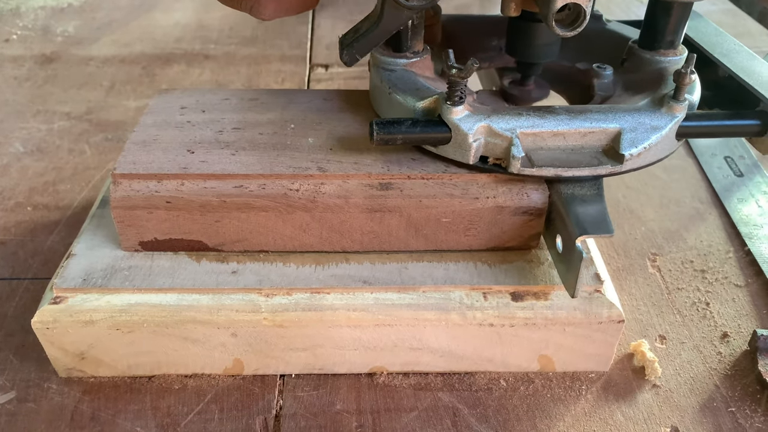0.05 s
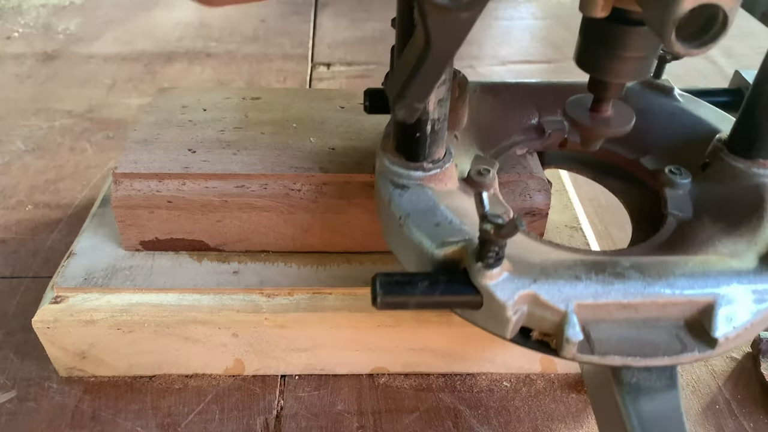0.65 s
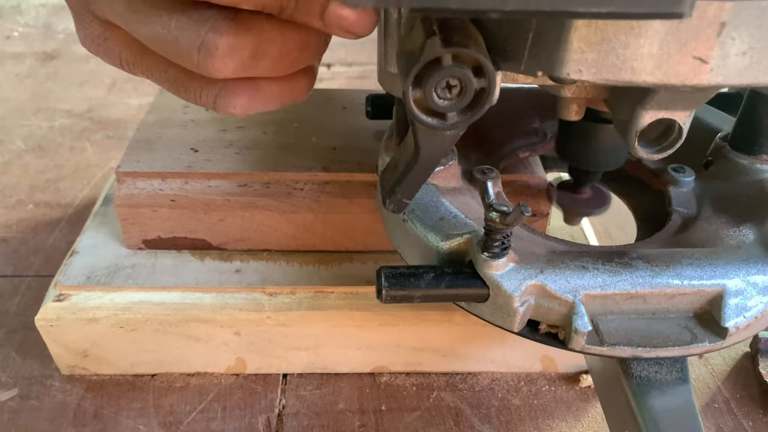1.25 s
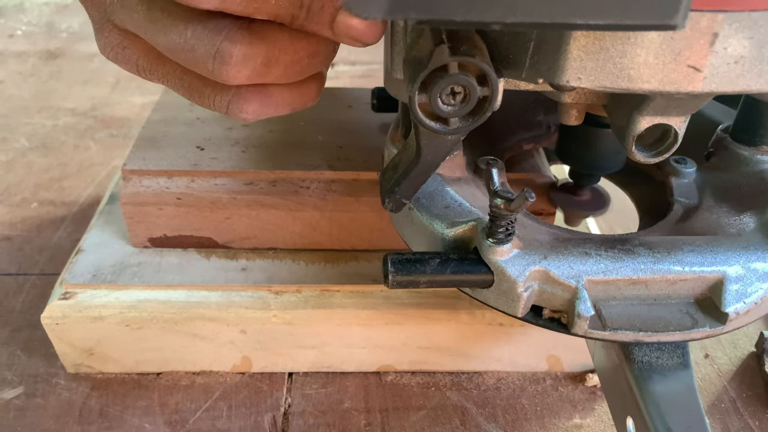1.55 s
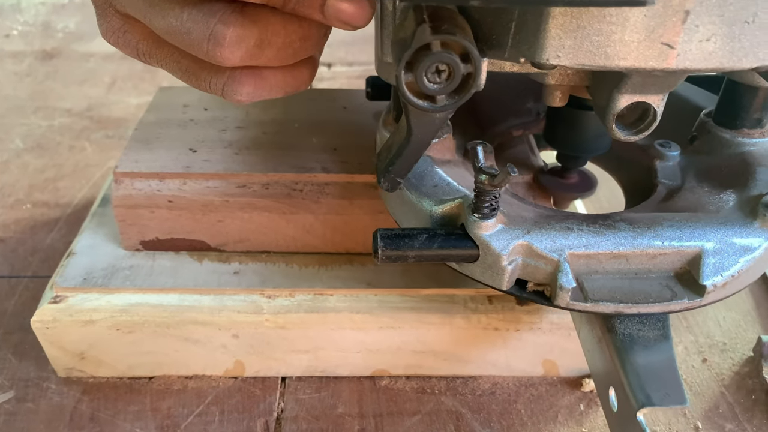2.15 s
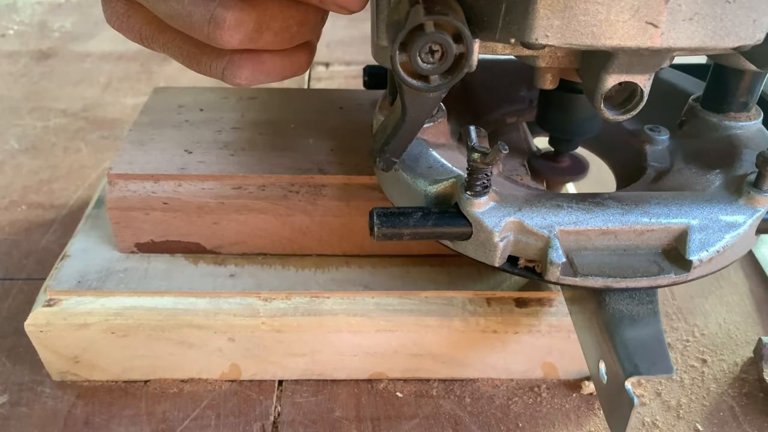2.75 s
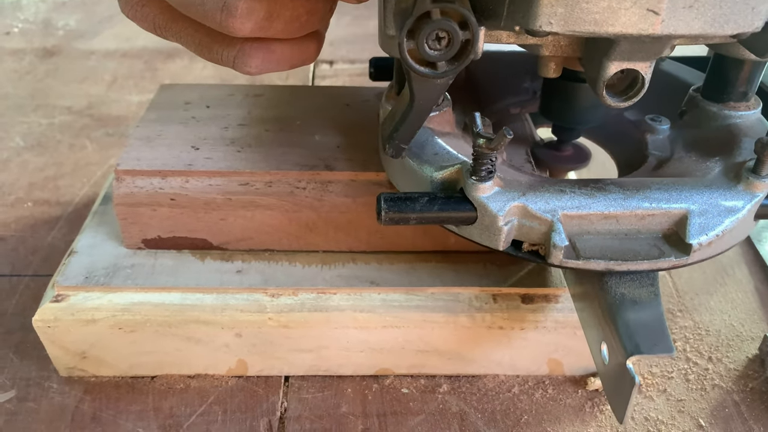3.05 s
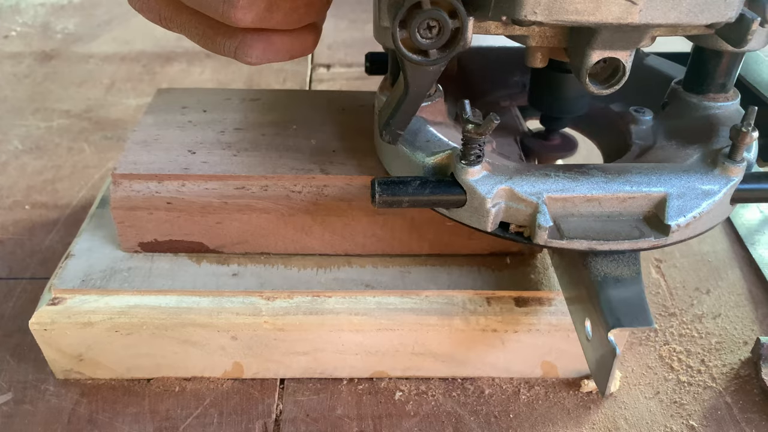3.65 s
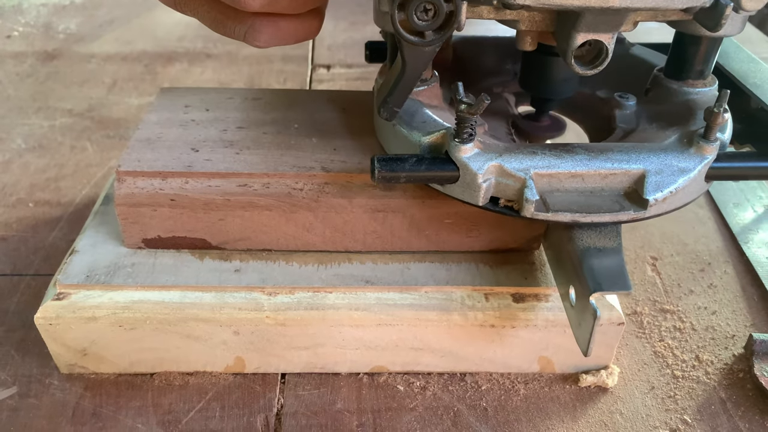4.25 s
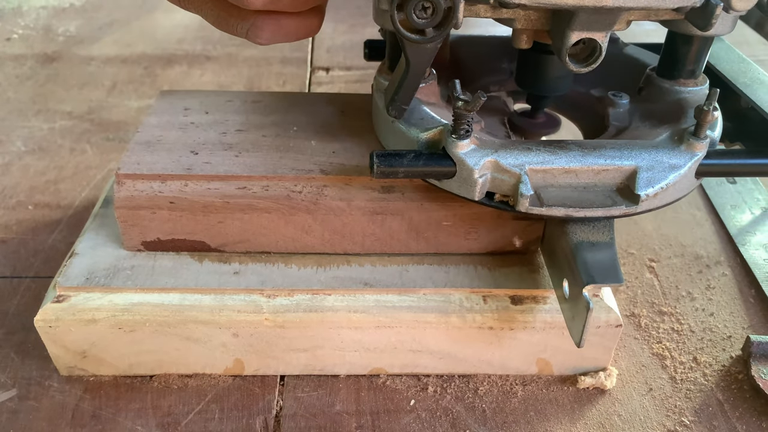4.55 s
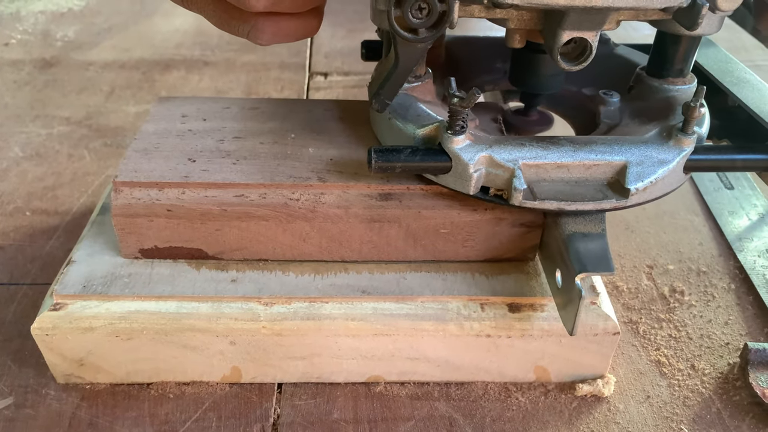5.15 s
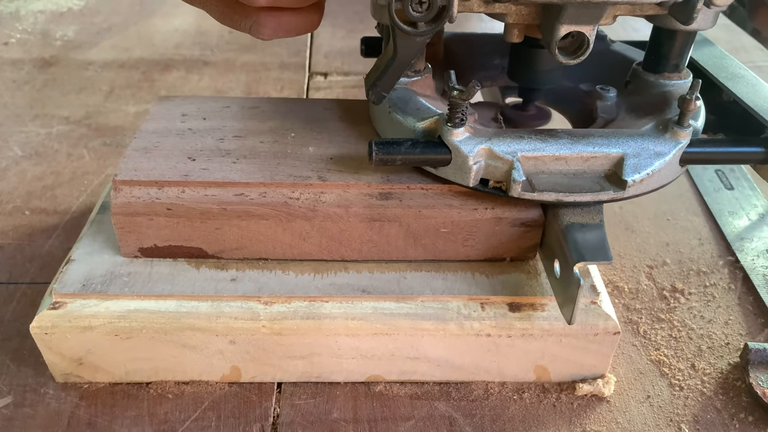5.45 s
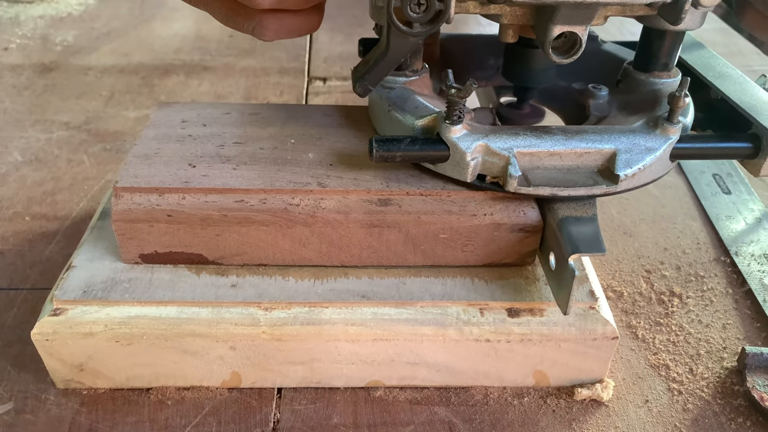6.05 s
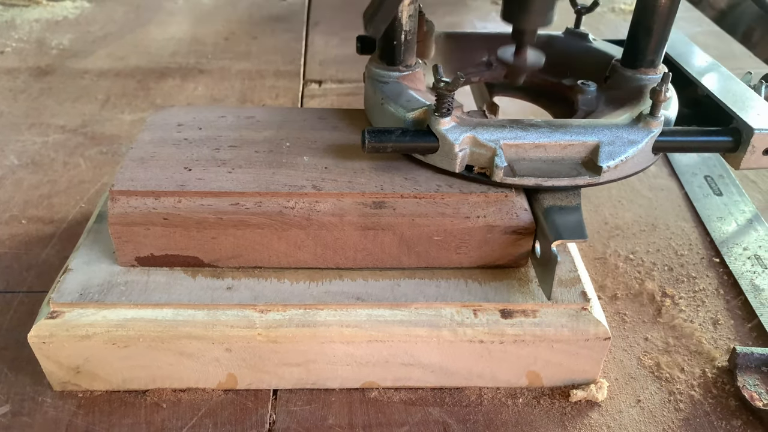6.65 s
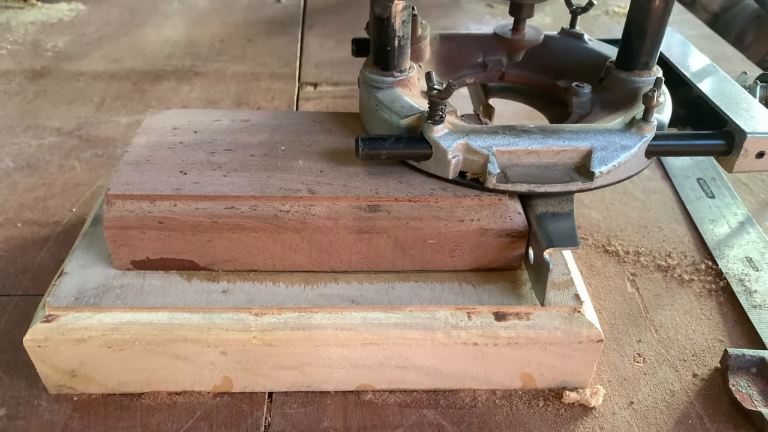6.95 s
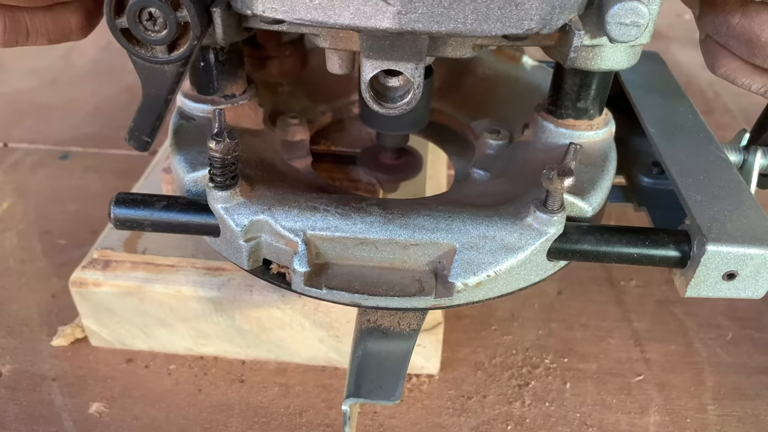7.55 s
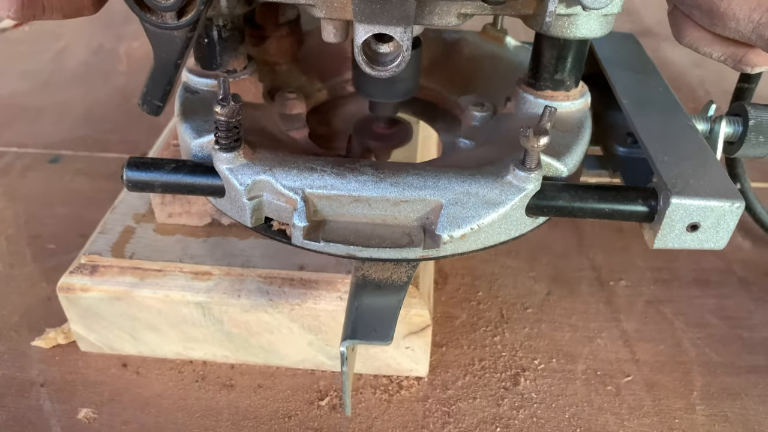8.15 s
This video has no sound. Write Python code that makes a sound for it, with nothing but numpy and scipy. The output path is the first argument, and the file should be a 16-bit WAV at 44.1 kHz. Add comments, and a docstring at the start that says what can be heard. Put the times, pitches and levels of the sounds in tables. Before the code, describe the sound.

A router runs up, bites into a wood block with a falling, buzzing whistle, clears it, then abruptly cuts again.

```python
"""A plunge router shapes the end of a hardwood block, beside a phone on a workbench.
It clears the wood and runs up in a bed of roaring, hissing cooling air; the base knocks, the fence rings.
At 1.8 s the bit bites and the spindle sags: hum, cutter whistle and fan whine glide down together,
while knife strokes buzz, chips crackle and the base judders. Near 6.5 s the bit comes free and the
pitch climbs. At 7.26 s a second pass breaks in abruptly, already in the wood."""
import sys
import numpy as np
from scipy import signal
from scipy.fft import rfft, irfft
from scipy.io import wavfile

SR = 44100
rng = np.random.default_rng(int(sys.argv[2]) if len(sys.argv) > 2 else 0)


def store_wav(level_fs):
    """Save 16-bit WAV to argv[1]."""
    pcm = np.round(np.clip(np.atleast_2d(level_fs), -1, 1) * 32767)
    wavfile.write(sys.argv[1], SR, pcm.T.astype(np.int16))


N = 370440
TIME = np.arange(N) / SR
FREQ = np.maximum(np.arange(N // 2 + 1) * SR / N, 1)
SIDES = np.array([[1], [-1]])  # left, right
MID_CUT_S, SECOND_PASS_S = 4.5, 7.263
FULL_BITE_DB, CUT_ROAR_DB = -30.5, -54  # reference points for whistle and roar in the cut

# Stereo image at the phone's two microphone ports; a lead is the left side's phase lead:
# f/Hz, coherence/0-1, lead/rad, lead for air from the gap/rad, lead for second-pass air/rad
PORT_IMAGE = [(70.4, 0.93, -4.5, -3.5, -4.5), (221, 1, -3, -2.5, -3), (350, 0.93, -0.5, -1.5, -1.3),
              (516, 0.85, 0.5, 2, 0.8), (773, 0.85, 1.8, 1.84, 1.77), (1090, 0.94, 0.45, .4, 1.86),
              (1400, .8, 1.1, 1, -1), (1800, 0.68, -1.2, -.9, -1), (2300, 0.33, -1.5, -1.5, 0.5),
              (2750, .45, -1.5, -1, 0), (3300, 0.46, -.4, 1.5, 1.2), (3750, 0.64, 0.5, -1.9, -1),
              (4200, 0.8, -1.1, -3, -0.3), (4770, 0.47, -2.5, -3.5, 3.3), (5400, .25, -2, -2, 0.7),
              (6100, 0.5, 0, 0.5, 2), (6800, 0.36, -0.4, 0.2, 0.2), (8000, 0.26, -2.5, -4.5, -2.7),
              (8650, .27, -2, -0.5, -4.5), (9400, 0.06, -0.2, -3, -5.5), (12500, 0.2, 1.5, -4.5, -4.5),
              (15000, .1, -7, -6, -7)]
# Left minus right at the ports: f/Hz, balance/dB
PORT_BALANCE = [(600, 0.5), (1300, -4.5), (2400, 0), (4400, 0.5), (6500, 2), (9000, 1), (11500, -0.5),
                (12200, -9), (15000, -22)]
# Thin jet of cooling air, strongest as the bit enters: t/s, level/dB
JET_LEVEL = [(0, -62), (.7, -51), (1.2, -47.5), (2.15, -47.5), (2.8, -52.5), (3.2, -63), (4, -59),
             (6.6, -69), (7.25, -77), (7.3, -58), (8.4, -64)]
# Air faders for each pass, ahead of the trims: t/s, roar/dB, vent hiss/dB
AIR_FADERS_FIRST = [(0, -50, -48.5), (.42, -49.5, -45.5), (.72, -46, -42.5), (1.2, -46.5, -45.5),
                    (1.96, -45.5, -45), (3, -49, -48), (3.32, -53.5, -54), (4.1, -54, -56),
                    (4.3, -52.5, -52.5), (4.84, -54.5, -54), (6.55, -55.5, -54), (6.84, -52, -46),
                    (7.23, -53.5, -49.5)]
AIR_FADERS_SECOND = [(7.29, -41.5, -41.5), (7.57, -41, -41.5), (7.62, -41.5, -42), (8.36, -47, -46)]
# EQ of the air: f/Hz, gain at the start/dB, gain deep in the cut/dB, gain in the second pass/dB
AIR_EQ = [(30.02, -32, -49, -50), (74, -16.5, -11, -12), (108, -13, -23, -16.5), (165, -18, -16, -20),
          (223, -5.5, -6.5, -15), (300, -10, -7.5, -14), (460, -6, -5.5, -7), (750, -1, 3, -2.5),
          (1090, 2.5, 3.5, 6), (1560, -0.5, 1, -6.5), (1930, 5.5, 6.5, 3), (2060, 1, 1.5, 4.5),
          (2630, -.5, 3, -9), (2980, -6.5, -10, -6), (3360, -5, -5.5, -2.5), (4050, 4.5, -8.5, 3),
          (4520, 2.5, -3.5, 2), (5380, 4.5, -2, 2), (6400, 2, -4, -1), (7300, -0.5, -3.5, 0.5),
          (7970, -2, -3.5, -3), (9880, -3, -13.5, -5), (11870, -18, -38, -15), (12160, 2, -4, -4),
          (16000, -9.5, -15.5, -16)]
# The base closes over the cut and opens again: t/s, mix/0-1
COVER_MIX = [(2.4, 0), (3.3, 1), (6.3, 1), (6.8, 0.35)]
# The bit is lowered to the block's edge, leaving a narrow gap: t/s, mix/0-1
GAP_MIX = [(.9, 0.24), (1.25, 0.9), (2.5, 1), (3.3, 0.3)]
# Air resonances in that gap: f/Hz, width/Hz, lift/dB
GAP_PEAKS = [(3240, 230, 11.5), (7900, 2100, 8.5), (9000, 690, -0.5)]
# Body of the base's knock on the block: f/Hz, width/Hz, relative level/dB
KNOCK_MODES = [(290, 120, -1), (510, 260, -4)]
# Ring of the metal fence: f/Hz, level/dB
FENCE_MODES = [(1310, -46), (1830, -48.5)]
# Bearing drones; an order is a multiple of spindle speed: order, level/dB, dB per dB of roar, lead/rad
BEARING_TONES = [(.5, -79, .5, -2.5), (0.655, -78, 0.5, -1.9), (4.35, -66.5, 0.86, -1.5)]
# The base rests unevenly and rocks: t/s, length/s, level/dB
ROCKING = [(0.287, 0.11, -49), (0.61, .08, -57), (0.69, 0.2, -51), (2.16, 0.34, -55), (2.801, 1, -71)]
# Fan whine, fading in and out as the tool is turned: t/s, level/dB, lead/rad
FAN_WHINE = [(0, -53.5, -4), (.2, -57, -1.3), (.33, -43, -1.1), (.5, -46.5, -2.5), (.84, -45, -2),
             (1.05, -58, -2.5), (1.38, -51.5, 1), (1.65, -66, 1), (1.9, -51, -2.5), (2.12, -46, 1.2),
             (2.6, -50.5, -2.6), (2.85, -54, -2), (3.1, -49.5, -2), (4.25, -55.5, -2), (4.5, -62, -2),
             (5.1, -66, -1), (5.7, -52.5, -.6), (6.38, -53, -1.4), (6.52, -63, -2.2), (6.66, -55.5, -2),
             (6.72, -49, -6), (6.83, -45.5, 0.7), (7.02, -52.5, -0.7), (7.2, -50, -2), (7.3, -51, 0.8),
             (7.56, -45.5, 0), (7.73, -52.5, 1.2), (7.9, -45.5, 1), (8, -54, 1), (8.2, -45.5, 0.6),
             (8.35, -54, 2)]
# Spindle hum: t/s, level/dB
HUM_LEVEL = [(0, -45), (.2, -42.5), (.88, -49), (1.12, -62.5), (1.36, -56.5), (1.45, -46.5), (2.13, -43),
             (2.24, -49.5), (2.5, -40.5), (2.74, -39), (3.41, -56.5), (3.67, -46), (4.43, -45),
             (4.85, -53.5), (5.91, -55), (6.6, -44), (7.1, -50.5), (7.3, -47), (7.9, -48.5), (8.3, -53)]
# The hum ducks as the tool is swung about: t/s, length/s
HUM_DUCKS = [(0.128, 0.074), (0.276, 0.11), (0.43, 0.28), (0.748, 0.12), (6.73, 0.094)]
# Spindle speed for each pass, running up while free and sagging in the wood: t/s, f/Hz
SPINDLE_FIRST = [(0.0, 477), (0.2, 480.3), (0.33, 497.4), (0.54, 513.4), (1.18, 544.2), (1.6, 553.7),
                 (1.83, 557.6), (1.95, 553), (2.17, 534.6), (2.63, 490), (3.07, 455.4), (3.39, 442.2),
                 (3.6, 436.5), (3.77, 436.2), (4.08, 430.5), (4.59, 428), (4.81, 433.7), (5.8, 431.7),
                 (6.03, 435.5), (6.2, 437.8), (6.47, 455.5), (6.68, 480), (6.84, 494.3), (7.25, 449.6)]
SPINDLE_SECOND = [(7.28, 473.7), (7.41, 480.4), (7.56, 481), (7.75, 479.5), (8.08, 468), (8.39, 466.2)]
# The bit is in the wood during the first pass: entry t/s, exit t/s
IN_WOOD = [(-.1, 0.14), (1.811, 6.48)]
# How hard the knives bite in each pass: t/s, whistle level/dB, left minus right/dB
KNIFE_BITE_FIRST = [(.1, -33.5, -3), (1.85, -37.5, -.5), (2.12, -36.5, .3), (2.46, -41, .5),
                    (2.62, -34.5, -1.5), (3.02, -28.5, -2.5), (3.19, -32.5, -3), (4.15, -34.5, -4.5),
                    (4.5, -37, -8), (4.66, -41, -8.5), (4.88, -36.5, -7), (6.14, -36.5, -6.5),
                    (6.22, -42, -4), (6.36, -38, -4), (6.45, -46.5, -4)]
KNIFE_BITE_SECOND = [(7.27, -35.5, -6), (7.52, -32, -4), (7.84, -32.5, -4), (7.96, -30, -5),
                     (8.06, -31.5, -1), (8.18, -30.5, -6), (8.24, -34, -1), (8.39, -31, -1.5)]
# Resonances of base plate and housing that the overtones glide through: f/Hz, width/Hz, lift/dB
HOUSING_PEAKS = [(2458, 293, 11.5), (3890, 680, 7), (4590, 300, 2), (5400, 220, 13), (7670, 270, 7.5),
                 (9260, 730, 13.5)]
# One overtone of the router swells briefly, in the wood or spinning free: t/s, length/s, order, level/dB
OVERTONE_SWELLS = [(.02, 0.3, 2, -49), (.3, .4, 2, -55), (.02, .25, 3, -52), (.03, 0.35, 5, -53),
                   (0.04, 0.33, 6, -56), (0.03, 0.4, 7, -62), (.02, 0.29, 11, -57), (0.184, 0.14, 4, -52),
                   (0.503, 0.67, 3, -53), (0.87, 0.5, 2, -50.5), (1.86, 0.28, 14, -45.5),
                   (1.84, 0.2, 16, -53), (1.9, 0.36, 22, -51), (2.12, 0.55, 7, -51), (2.12, 0.25, 14, -47),
                   (2.12, .3, 16, -54), (2.23, 0.35, 8, -53), (2.12, .3, 6, -53), (2.35, .2, 6, -55),
                   (2.36, 0.58, 2, -39), (2.454, 1.2, 3, -46), (2.8, .7, 7, -55), (2.556, 1.4, 5, -50),
                   (2.8, .4, 11, -56), (2.85, .8, 8, -50), (2.85, 1.1, 18, -58), (2.9, .9, 28, -59),
                   (3, 0.81, 24, -60.5), (2.905, 0.33, 14, -44), (2.95, .35, 13, -56),
                   (2.95, 0.75, 20, -55), (2.99, 0.7, 10, -48), (3.2, .9, 6, -47), (3.35, .7, 14, -54),
                   (3.9, .9, 26, -61), (3.35, .7, 22, -63), (3.2, 0.3, 8, -54), (3.3, 1.7, 2, -48),
                   (3.75, 1.1, 5, -57), (3.9, 2.2, 3, -50), (3.65, .4, 10, -54), (3.8, .5, 8, -59),
                   (4.03, 1.3, 18, -52), (4.22, 0.5, 10, -51), (4.25, 0.7, 13, -54), (4.345, 0.32, 9, -54),
                   (4.48, .35, 5, -56), (4.38, 0.49, 8, -56), (4.85, .35, 9, -66), (5.05, 1.1, 10, -53),
                   (5.4, 0.72, 9, -60), (5.5, .8, 18, -57), (6.42, .25, 18, -58), (5.4, 1.5, 20, -62),
                   (5.35, 1.5, 16, -57), (5.6, 0.8, 10, -56), (5.98, 0.3, 8, -52), (6.28, .2, 8, -53),
                   (6.3, .3, 3, -57), (6.287, 0.45, 2, -51), (6.41, 0.25, 16, -54), (6.85, .25, 3, -55),
                   (6.88, .25, 5, -53), (7.36, 0.3, 6, -45), (7.55, 1, 2, -46), (7.53, .15, 17, -56),
                   (7.65, .8, 7, -56), (7.6, 1.1, 5, -50), (7.68, .16, 6, -49), (7.9, 0.4, 6, -44),
                   (8.27, .45, 6, -49), (8.053, .35, 16, -54), (8.15, 0.5, 13, -55), (4.11, 0.3, 6, -46),
                   (4.8, .7, 6, -49), (5.4, 1, 6, -50), (6.05, 1, 6, -47.5), (6.82, 0.14, 4, -51),
                   (7.598, .1, 11, -47.5)]
# Knife-stroke buzz, up into the treble: order, relative level/dB, lead/rad
BUZZ_TONES = [(5, -12.5, -1.5), (7, -11.5, -1), (9, -16.5, -0.5), (11, -10.5, 1), (13, -3.5, -1.8),
              (15, -10, 3), (16, -12, -1), (17, -13, -3.5), (19, -16, -3.5), (20, -16.5, 0.3), (21, -24, 2),
              (22, -15.5, 0.7), (23, -13, 2.7), (24, -17, 1.3), (26, -22, 4), (28, -7, -1.5), (30, -5, -1),
              (32, -7, -4), (34, -7, -3)]
# Overtones of the two knives, ahead of the housing's lift: order, free level re roar/dB,
# level at full bite/dB, dB per dB of bite, second-pass lift/dB, lead in mid cut/rad,
# its drift as the tool travels/(rad/s), second-pass lead/rad
KNIFE_TONES = [(2, -12, -48.5, 0.62, 5, 2, -0.043, -2), (3, -13, -59, 1, 12, 0.93, 0.26, 1.05),
               (6, -34, -55, 2, -3, -2.3, 0.42, -0.9), (8, -33, -62, 0.3, -4, 1.13, .1, 4),
               (10, -32, -55, 1.8, -8, 2, -0.00079, 1.5), (14, -28, -58.5, 1, -10, 0, 0.51, -5),
               (18, -34, -59.5, 2, -6, 1.3, 0.47, 0)]
# The whistle's image shifts with its pitch: f/Hz, lead/rad
WHISTLE_IMAGE = [(1740, -0.7), (1980, -0.67), (2170, 0.63)]


def undb(db):
    """Decibels to gain."""
    return 10 ** (np.asarray(db) / 20)


def unit(x):
    """Scale to rms 1."""
    return x / np.sqrt(np.mean(x ** 2))


def curves(rows):
    """One automation lane per column, in straight ramps over time."""
    times, *columns = np.transpose(rows)
    return np.array([np.interp(TIME, times, column) for column in columns])


def passes(first, second):
    """Hard switch from the first pass to the second."""
    return np.where(TIME < SECOND_PASS_S, first, second)


def swell(centre_s, length_s):
    """A smooth rise and fall, peak 1."""
    return np.cos(np.pi * np.clip((TIME - centre_s) / length_s, -.5, .5)) ** 2


def walk(rate_hz):
    """Smooth random modulator of rms 1, rolling off above rate_hz."""
    count = N // 30
    hz = np.arange(count // 2 + 1) * SR / N
    slow = irfft(rfft(rng.standard_normal(count)) / (1 + (hz / rate_hz) ** 4), count)
    return np.interp(TIME, np.linspace(0, TIME[-1], count), unit(slow))


def spectrum(rows):
    """Points joined on a log-frequency axis."""
    hz, value = np.transpose(rows)
    return np.interp(np.log(FREQ), np.log(hz), value)


def resonance(hz, width_hz):
    """Response of one damped mode, gain 1 at its centre."""
    return 1 / (1 + 1j * (FREQ / hz - hz / FREQ) * hz / width_hz)


def lift_db(hz, peaks):
    """Lift that a set of resonances gives a frequency."""
    return sum(db / (1 + (2 * (hz - centre) / width) ** 2) for centre, width, db in peaks)


def pan(db):
    """Left and right gains at constant power."""
    gains = undb(SIDES * db / 2)
    return gains / np.sqrt(np.mean(gains ** 2, axis=0))


def ports(pair, lead_column=0):
    """Spectra of two unrelated noises as the microphone ports hear them."""
    mid, side = rfft(pair)
    hz, coherence, *leads = np.transpose(PORT_IMAGE)
    alike = np.clip(spectrum(np.c_[hz, coherence]), 0, .99)
    stereo = mid * np.sqrt(1 + alike) + SIDES * side * np.sqrt(1 - alike)
    phase_shift = np.exp(.5j * SIDES * spectrum(np.c_[hz, leads[lead_column]]))
    return stereo * phase_shift * pan(spectrum(PORT_BALANCE))


def shaped_noise(response):
    """Filtered noise at the ports, rms 1."""
    return unit(irfft(ports(rng.standard_normal((2, N))) * response, N))


def partial(angle, lead):
    """A sine of rms 1, its left side ahead by lead radians."""
    return np.sqrt(2) * np.sin(angle + rng.uniform(0, 2 * np.pi) + SIDES * lead / 2)


def jet():
    """Air squeezed under the base sings in a narrow, very high band."""
    return shaped_noise(resonance(hz=12650, width_hz=1900) ** 2) * undb(curves(JET_LEVEL)[0])


def air(angle, roar_db, hiss_db, crossover_hz=3000, flicker_db=1.1, roar_trim_db=1.51, hiss_trim_db=2.5):
    """The bed: fan air roars in the housing and hisses from the vents; the base colours it."""
    noise = rng.standard_normal((2, N))
    hz, *eq_columns = np.transpose(AIR_EQ)
    free_eq, covered_eq, second_eq = (undb(spectrum(np.c_[hz, db])) for db in eq_columns)
    flow = ports(noise)
    gap_flow = ports(noise, lead_column=1) * undb(lift_db(FREQ, GAP_PEAKS))
    colours = (flow * free_eq, gap_flow * free_eq, flow * covered_eq,
               ports(noise, lead_column=2) * second_eq)
    cover, gap = curves(COVER_MIX)[0], curves(GAP_MIX)[0]

    def band(response, db):
        """One band of air, crossfaded between the tool's positions."""
        lifted, lowered, deep, second = (unit(irfft(response * colour, N)) for colour in colours)
        uncovered = (1 - gap) * lifted + gap * lowered
        first = (1 - cover) * uncovered + cover * deep
        return passes(first, second) * undb(db + flicker_db * walk(21))

    lows = 1 / (1 + (FREQ / crossover_hz) ** 12)
    throb = 1 + 0.029 * np.sin(angle)  # once a turn
    return band(lows, roar_db + roar_trim_db) + band(1 - lows, hiss_db + hiss_trim_db) * throb


def knock(at_s=0.65, length_s=0.11, level_db=-51):
    """The base is set down on the block with a soft knock."""
    body = sum(undb(db) * resonance(hz, width) ** 2 for hz, width, db in KNOCK_MODES)
    return undb(level_db) * swell(at_s, length_s) * shaped_noise(body)


def scrape(at_s=0.724, length_s=0.14, slip_rad=.25, flutter_db=1):
    """The fence rubs along the block and rings unevenly as it slides."""
    ring = 0
    for hz, db in FENCE_MODES:
        gain = undb(db + flutter_db * walk(60))
        ring += gain * partial(2 * np.pi * hz * TIME + slip_rad * walk(50), lead=.5)
    return swell(at_s, length_s) * ring


def bearings(angle, roar_db, slip_rad=0.25):
    """Balls and cages drone below and between the harmonics; slip smears their pitch."""
    out = 0
    for order, db, follow, lead in BEARING_TONES:
        gain = undb(db + follow * (roar_db - CUT_ROAR_DB))
        out += gain * partial(order * angle + slip_rad * walk(6.9), lead)
    return out


def judder(angle):
    """Rocking on its base every second turn, the tool drones an octave under the hum."""
    envelope = sum(undb(db) * swell(at_s, length_s) for at_s, length_s, db in ROCKING)
    return envelope * partial(angle / 2, lead=-2.34)


def fan(angle, blades=12, flutter_db=2, jitter_rad=0.11):
    """The fan blades whine, fluttering and roughened by their own turbulence."""
    db, lead = curves(FAN_WHINE)
    return undb(db + flutter_db * walk(27)) * partial(blades * angle + jitter_rad * walk(64), lead)


def hum(angle, touch, duck_db=-18):
    """The unbalanced spindle shakes the tool once a turn, less steadily out of the wood."""
    ducking_db = duck_db * sum(swell(at_s, length_s) for at_s, length_s in HUM_DUCKS)
    flutter_db = (0.5 + (1 - touch) * 1.1) * walk(24)
    return undb(curves(HUM_LEVEL)[0] + ducking_db + flutter_db) * partial(angle, lead=-0.31)


def shaft_angle(speed_hz, wobble=0.000658, chatter=0.001096):
    """The spindle turns a little unevenly as the grain resists."""
    uneven_hz = speed_hz * (1 + wobble * walk(14.57) + chatter * walk(182))
    return 2 * np.pi * np.cumsum(uneven_hz) / SR


def contact(fade_s=0.039):
    """First-pass gate: 1 with the bit in the wood, 0 while it spins free."""
    return sum(np.clip(np.minimum(TIME - enters, leaves - TIME) / fade_s + .5, 0, 1)
               for enters, leaves in IN_WOOD)


def chips(touch, load_db, ticks_per_s=700, level_db=-63, follow=.3):
    """Torn fibres and flying chips tick densely against the base while the knives bite."""
    hits = rng.random((2, N)) < ticks_per_s / SR
    accents_db = 3 * np.minimum(rng.exponential(size=(2, N)), 4)
    crackle = irfft(ports(hits * undb(accents_db)) * resonance(hz=5000, width_hz=5000) ** 2, N)
    return unit(crackle) * touch * undb(level_db + follow * load_db)


def overtone_swell(order):
    """Extra gain as one overtone swells briefly, in the wood or spinning free."""
    return sum(undb(db) * swell(at_s, length_s)
               for at_s, length_s, swelling, db in OVERTONE_SWELLS if swelling == order)


def buzz(angle, speed_hz, touch, load_db, follow=0.19, wander_db=3.5, flutter_db=1.7, blur_rad=0.016):
    """Knife strokes buzz: overtones bloom through resonances, and uneven strokes smear the highest."""
    balance_db, out = spectrum(PORT_BALANCE), 0
    strength = touch * undb(passes(-58, -61) + follow * load_db)
    for order, db, lead in BUZZ_TONES:
        housing_db = lift_db(order * speed_hz, HOUSING_PEAKS)
        gain = strength * undb(db + housing_db + wander_db * np.minimum(walk(12), 1))
        sides = pan(np.interp(order * np.mean(speed_hz), FREQ, balance_db))
        tone = partial(order * (angle + blur_rad * walk(90)), lead + 0.24 * walk(2.9))
        out += np.hypot(gain, overtone_swell(order)) * undb(flutter_db * walk(26)) * sides * tone
    return out


def knife_whine(angle, speed_hz, touch, load_db, roar_db, free_wander_db=2, wander_db=1.7, flutter_db=1):
    """Knife overtones ring in the housing, wavering in free air and growing with the load in the wood."""
    out = 0
    for order, free_db, cut_db, follow, second_db, lead, drift, second_lead in KNIFE_TONES:
        free = undb(roar_db + free_db + free_wander_db * walk(13))
        cutting = undb(cut_db + follow * load_db + passes(0, second_db) + wander_db * walk(6.8))
        gain = ((1 - touch) * free + touch * cutting) * undb(lift_db(order * speed_hz, HOUSING_PEAKS))
        first_lead = touch * (lead + drift * (TIME - MID_CUT_S))
        tone = partial(order * angle, passes(first_lead, second_lead))
        out += np.hypot(gain, overtone_swell(order)) * undb(flutter_db * walk(24)) * tone
    return out


def whistle(angle, speed_hz, touch, bite_db, pan_db, roar_db, order=4, free_flutter_db=3, flutter_db=0.5):
    """The top of the mix: the cutter whistles faintly in free air and leaps up as it meets the wood."""
    pitch_hz = order * speed_hz
    free = undb(roar_db - 14 + lift_db(pitch_hz, HOUSING_PEAKS) + free_flutter_db * walk(25))
    cutting = undb(bite_db + flutter_db * walk(14)) * pan(pan_db)
    gain = (1 - touch) * free + touch * cutting + overtone_swell(order)
    lead = np.interp(pitch_hz, *np.transpose(WHISTLE_IMAGE))
    return gain * partial(order * angle, lead)


def scene():
    """Spindle speed and bite drive the router's tones; air, chips and handling fill in around them."""
    speed_hz, = passes(curves(SPINDLE_FIRST), curves(SPINDLE_SECOND))
    bite_db, pan_db = passes(curves(KNIFE_BITE_FIRST), curves(KNIFE_BITE_SECOND))
    roar_db, hiss_db = passes(curves(AIR_FADERS_FIRST), curves(AIR_FADERS_SECOND))
    angle = shaft_angle(speed_hz)
    touch = passes(contact(), 0.8)  # the second pass cuts throughout
    load_db = bite_db - FULL_BITE_DB
    motor = hum(angle, touch) + fan(angle) + bearings(angle, roar_db)
    bed = air(angle, roar_db, hiss_db) + jet()
    cutter = whistle(angle, speed_hz, touch, bite_db, pan_db, roar_db)
    cutter += knife_whine(angle, speed_hz, touch, load_db, roar_db)
    grit = buzz(angle, speed_hz, touch, load_db) + chips(touch, load_db)
    handling = judder(angle) + knock() + scrape()
    return bed + handling + motor + grit + cutter


def record(dry, top_hz=15700):
    """The phone shaves off the top end with a steep low-pass."""
    return signal.sosfilt(signal.ellip(14, .2, 80, top_hz, fs=SR, output="sos"), dry)


dry = scene()
out = record(dry)
store_wav(out)
```